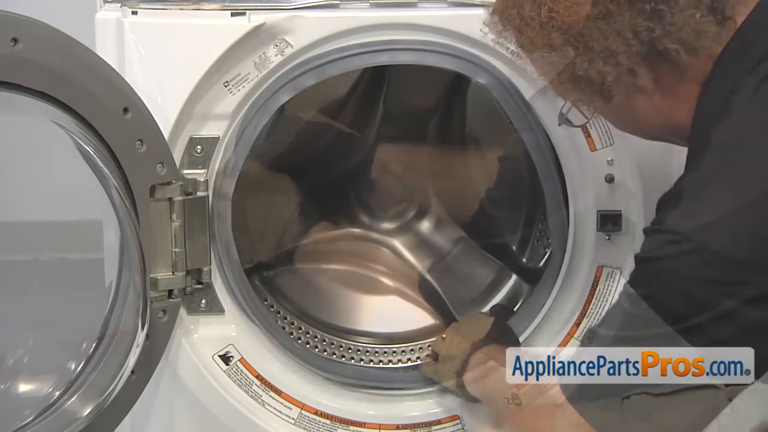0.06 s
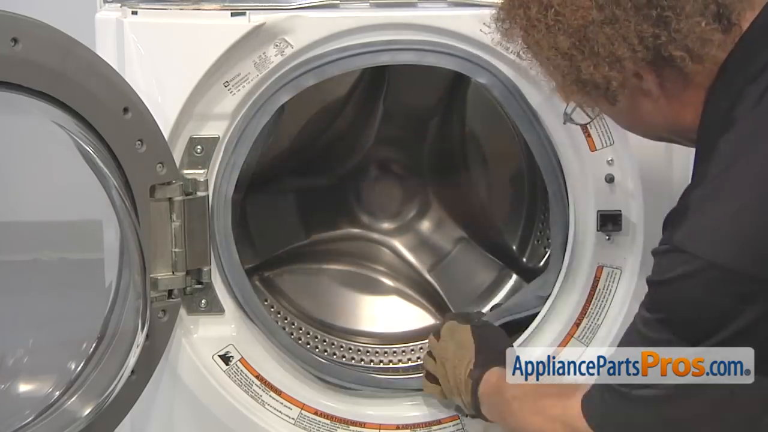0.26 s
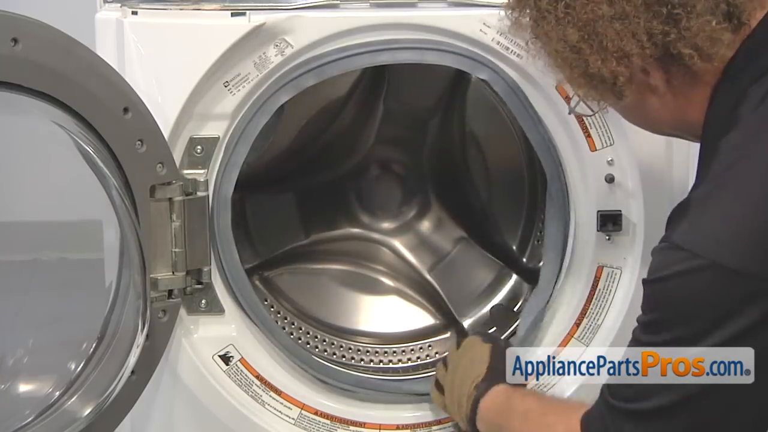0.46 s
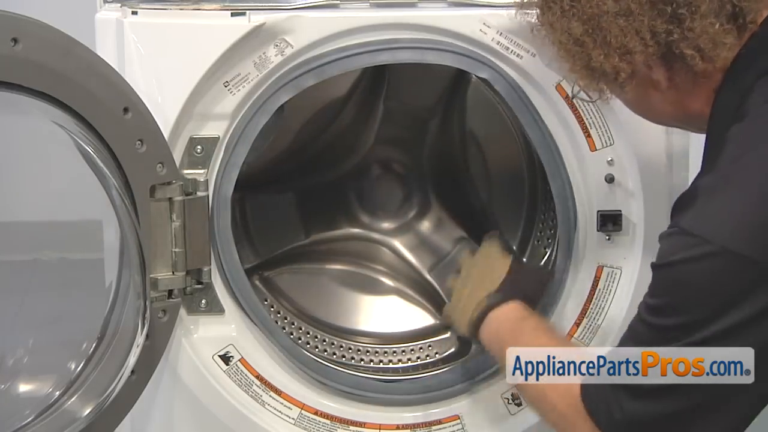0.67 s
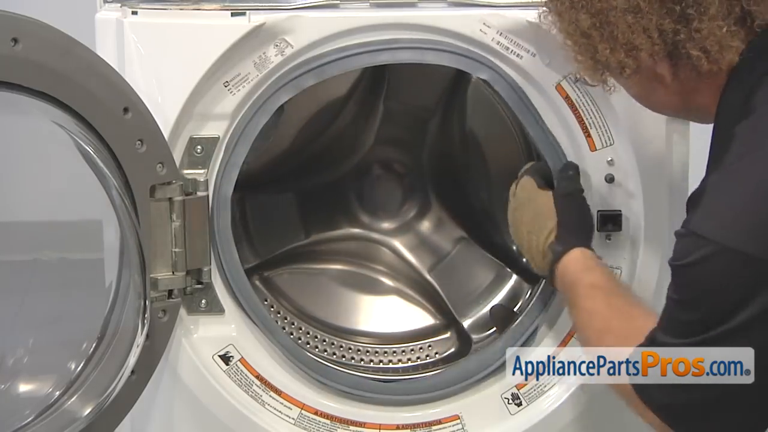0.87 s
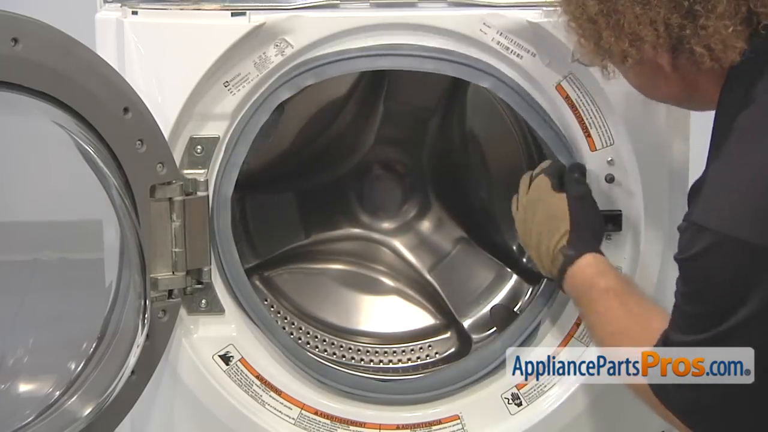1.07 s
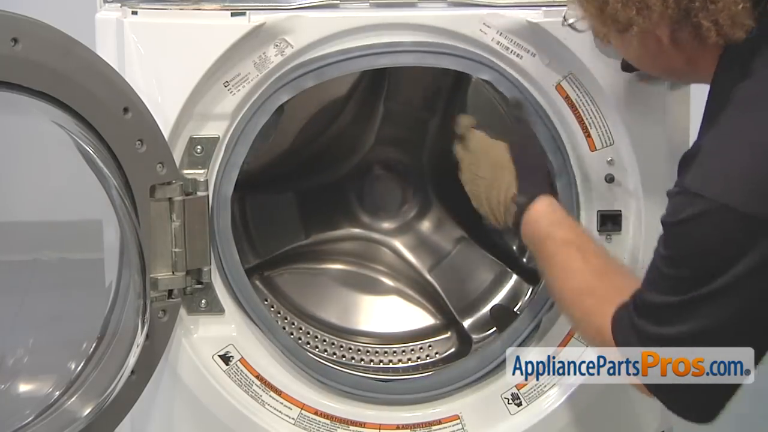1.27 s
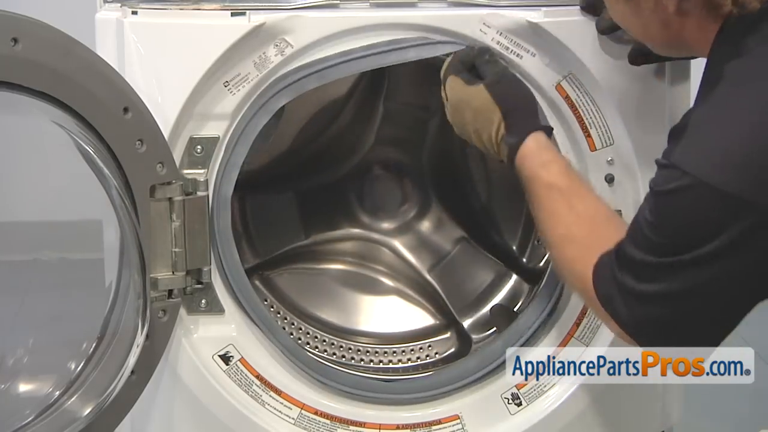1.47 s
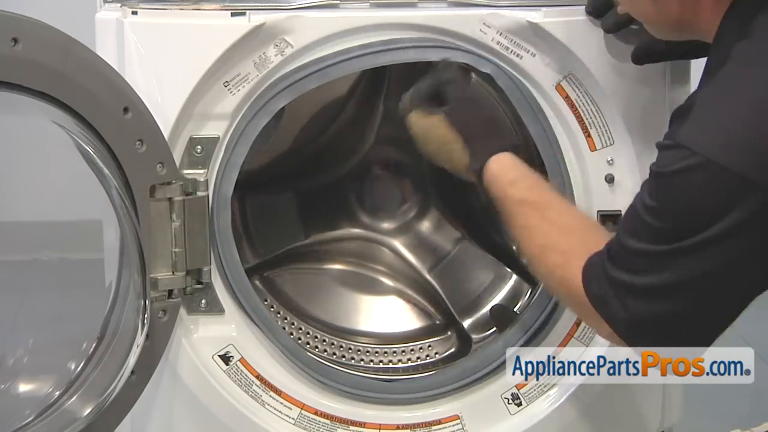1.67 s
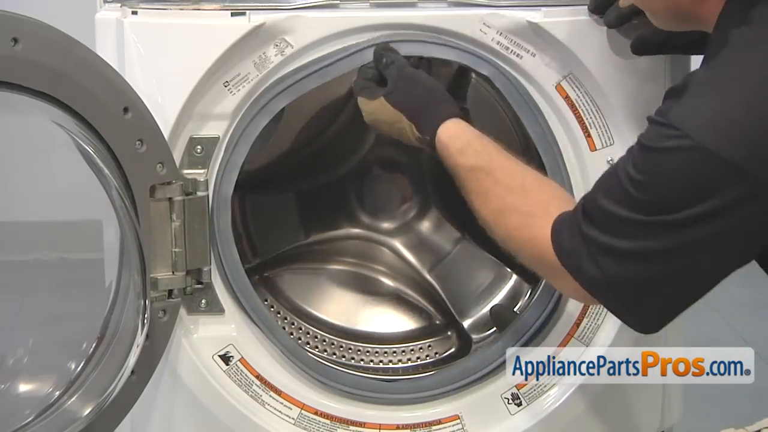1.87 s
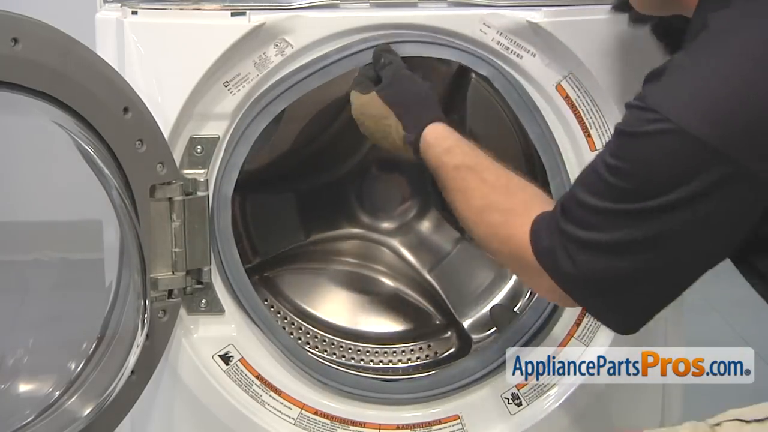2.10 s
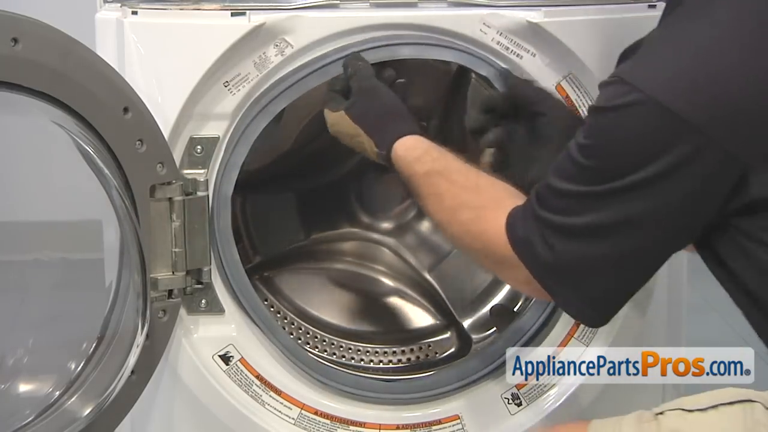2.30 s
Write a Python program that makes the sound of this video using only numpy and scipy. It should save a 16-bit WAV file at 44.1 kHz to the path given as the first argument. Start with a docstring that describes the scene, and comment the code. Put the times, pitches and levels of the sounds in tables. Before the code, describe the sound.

A rubber door seal is worked onto a washer in a small room, heard up close. A soft thump and two sharp snaps come first, followed by lighter knocks, faint glove rubbing and a short scuff that rings the steel drum.

```python
"""A glove brushes softly over rubber, then a tap and a low thump sound in a small room:
hands are pressing a door seal onto the rim of a washing machine. Finger impacts excite the modes
of the steel drum and the cabinet, each push makes the sprung tub boom, and the lip of the seal
snaps into place. Sliding gloves give friction noise, and the rubber judders briefly by stick-slip,
loudest near the end, setting the drum ringing."""
import sys
import numpy as np
from scipy import signal
from scipy.fft import rfft, irfft
from scipy.io import wavfile
from scipy.ndimage import uniform_filter1d

SR = 44100
rng = np.random.default_rng(int(sys.argv[2]) if len(sys.argv) > 2 else 0)


def digitize_waveform(pressure):
    """Quantize a signal to 16-bit integers and store it at the path in sys.argv[1].

    Rows of a 2-D input are taken as channels; values are limited to [-1, 1].
    """
    field = np.atleast_2d(pressure).T
    bounded = np.clip(field, -1, 1)
    quanta = np.round(bounded * 32767).astype(np.int16)
    wavfile.write(sys.argv[1], SR, quanta)


N = 105840
TIME = np.arange(N) / SR
EVENT_TIME = TIME[:SR // 2]


def amp(db):
    """Decibels to amplitude ratio."""
    return 10 ** (np.asarray(db) / 20)


def unit_rms(x):
    """Scales to rms 1."""
    return x / np.sqrt(np.mean(x ** 2) + 1e-20)


def unit_peak(x):
    """Scales so that the loudest 5 ms have rms 1."""
    return x / np.sqrt(uniform_filter1d(x ** 2, size=220).max() + 1e-20)


def value_at(points, hz):
    """Interpolates on a log-frequency axis."""
    point_hz, value = np.transpose(points)
    return np.interp(np.log(hz + 1), np.log(point_hz + 1), value)


def add(mix, start_s, sound):
    """Superposition: a sound adds to the mix from start_s on."""
    part = mix[max(round(start_s * SR), 0):][:len(sound)]
    part += sound[:len(part)]


def colour(x, spectrum):
    """Spectral shaping of a steady signal, at rms 1."""
    gain = amp(value_at(spectrum, np.fft.rfftfreq(len(x), 1 / SR)))
    return unit_rms(irfft(rfft(x) * gain, len(x)))


def decay(t, t60):
    """Exponential damping: 60 dB down in t60 seconds."""
    return np.exp(-np.log(1000) * t / t60)


def swell(peak_s, rise_s, fall_s):
    """Envelope of a pressure that builds until peak_s and lets go."""
    distance = (TIME - peak_s) / np.where(TIME < peak_s, rise_s, fall_s)
    return np.exp(1 - np.hypot(1, distance * np.sqrt(2)))


def click(spectrum, size=4096):
    """Minimum phase gives the sharpest click that has this spectrum."""
    log_gain = np.log(amp(value_at(spectrum, abs(np.fft.fftfreq(size, 1 / SR)))))
    response = np.exp(np.conj(signal.hilbert(log_gain)))
    return np.fft.ifft(response).real[:size // 2]


def burst(spectrum, t60, direct):
    """Multiple reflection: a click and its dense, quickly dying echoes inside the machine."""
    echoes = rng.choice([-1., 1.], len(EVENT_TIME)) * decay(EVENT_TIME, t60)
    paths = echoes / np.linalg.norm(echoes) + direct * (EVENT_TIME == 0)
    return unit_peak(signal.fftconvolve(paths, click(spectrum))[:len(EVENT_TIME)])


def ring(modes):
    """Free vibration: a struck body sounds as a sum of damped modes."""
    return unit_peak(sum(amp(db) * decay(EVENT_TIME, t60) * np.cos(2 * np.pi * hz * EVENT_TIME)
                         for hz, db, t60 in modes))


def soften(x, cutoff_hz):
    """A soft contact acts as a low-pass filter."""
    lowpass = signal.butter(3, min(cutoff_hz, SR / 3), fs=SR, output="sos")
    return unit_peak(signal.sosfilt(lowpass, x))


# Background spectrum. Each row: frequency in Hz, relative density in dB.
ROOM_TONE_SPECTRUM = [(12, -11), (20, -0.5), (60, -3), (83, -2.5), (150, -11.5), (285, -8.5), (459, -43.5),
                      (718, -14.5), (1030, -23), (1290, -22), (3160, -31.5), (13200, -33), (16000, -32.5)]

def room_tone(level_db=-64):
    """Stationary noise, strongest in the bass."""
    return amp(level_db) * colour(rng.standard_normal(N), ROOM_TONE_SPECTRUM)


# Reverberation times. Each row: frequency in Hz, t60 in seconds.
ROOM_T60 = [(100, 0.54), (300, 0.37), (750, 0.17), (1500, 0.16), (4000, 0.18), (14000, 0.14)]

def reverberation(x, onset_s):
    """A diffuse field builds up and decays, the bass lasting longest."""
    hz, t, noise = signal.stft(rng.standard_normal(len(EVENT_TIME)), SR, nperseg=256)
    damped = noise * decay(t, value_at(ROOM_T60, hz)[:, None])
    tail = signal.istft(damped, SR, nperseg=256)[1][:len(EVENT_TIME)]
    tail *= 1 - np.exp(-(EVENT_TIME / onset_s) ** 2)
    return signal.fftconvolve(x, tail / np.linalg.norm(tail))[:N]


# Spectrum of the swaying tub. Each row: frequency in Hz, relative density in dB.
SWAY_SPECTRUM = [(20, -15.5), (45, 2), (85, 2), (130, -5.5), (290, -11), (450, -22), (1000, -64),
                 (4000, -44)]
# Strength of the sway. Each row: time in seconds, level in dB.
SWAY_LEVELS = [(0, -59), (.35, -51), (.7, -54), (1.1, -57.5), (1.7, -56), (2.1, -57.5), (2.4, -60.5)]

def tub_sway():
    """Forced vibration: the sprung tub rumbles as it sways under the hands."""
    level_db = np.interp(TIME, *np.transpose(SWAY_LEVELS))
    return amp(level_db) * colour(rng.standard_normal(N), SWAY_SPECTRUM)


# Spectra of fabric hiss and rubber scuff. Each row: frequency in Hz, relative density in dB.
HISS_SPECTRUM = [(300, -20), (1500, -1.5), (4000, -3), (7000, 2.5), (9500, -4.5), (12000, 3.5),
                 (16000, -5.5)]
SCUFF_SPECTRUM = [(80, 11.5), (300, 3), (750, 4.5), (1400, -4), (2200, -8.5), (5000, -18.5), (16000, -38)]
# Glove strokes. Each row: peak time, rise and fall in seconds, hiss and scuff levels in dB.
STROKES = [(0.058, 0.091, 0.062, -70.5, -61.5), (.265, 0.052, 0.033, -66.5, -68.5),
           (0.608, 0.09, 0.058, -71, -56.5), (.84, 0.022, 0.012, -70, -94),
           (0.972, 0.012, 0.012, -76, -56.5), (1.035, 0.052, 0.038, -70, -67),
           (1.248, 0.023, 0.013, -61.5, -63.5), (1.52, 0.15, 0.077, -81, -64),
           (1.711, 0.031, 0.065, -74.5, -66.5), (1.88, 0.033, 0.027, -73, -74.5),
           (1.959, 0.022, 0.022, -67.5, -57), (2.112, 0.024, 0.0067, -61.5, -47.5),
           (2.306, 0.012, 0.028, -59.5, -63)]

def glove_strokes(grain_db=3):
    """Sliding friction: fabric hisses and rubber scuffs, both in fine grains."""
    grains = amp(grain_db * np.minimum(rng.exponential(1, N), 4))
    hiss = colour(rng.standard_normal(N) * grains, HISS_SPECTRUM)
    scuff = colour(rng.standard_normal(N) * grains, SCUFF_SPECTRUM)
    return sum(swell(peak_s, rise_s, fall_s) * (amp(hiss_db) * hiss + amp(scuff_db) * scuff)
               for peak_s, rise_s, fall_s, hiss_db, scuff_db in STROKES)


# Modes of drum and rim. Each row: frequency in Hz, relative level in dB, t60 in seconds.
DRUM_MODES = [(523, -7, .07), (592, -3, .085), (702, 0, .08), (765, -7, .07), (836, 1, .08), (1100, 0, .06),
              (1335, 3, .06), (1760, -14, .05), (2270, -10, .06)]
# Judders of the rubber. Each row: peak time, rise and fall in seconds, gain in dB,
# slips per second, cutoff in Hz.
RUBBER_JUDDERS = [(.300, 0.01, 0.0029, -55, 228.8, 740), (0.56, 0.0062, 0.0017, -45.5, 262, 860),
                  (2.1133, 0.015, 0.0032, -36, 119, 1300)]

def rubber_judder(jitter=0.02, grit=0.03):
    """Stick-slip friction: short runs of uneven slips drive the drum's modes."""
    out = np.zeros(N)
    for peak_s, rise_s, fall_s, db, slip_hz, cutoff_hz in RUBBER_JUDDERS:
        wander = unit_rms(uniform_filter1d(rng.standard_normal(N), size=300))
        cycles = np.cumsum(slip_hz * (1 + jitter * wander)) / SR
        cycles -= np.interp(peak_s, TIME, cycles)  # one slip lands on the peak
        slips = np.diff(np.floor(cycles), prepend=np.floor(cycles[0]))
        force = (slips + grit * rng.standard_normal(N)) * swell(peak_s, rise_s, fall_s)
        drum = soften(ring(DRUM_MODES), cutoff_hz)
        out += amp(db) * signal.fftconvolve(force, drum)[:N]
    return out


# Pushes on the tub. Each row: start in seconds, level in dB, pitch in Hz, hold and t60 in seconds.
TUB_THUMPS = [(0.257, -32, 92.3, 0.0086, 0.26), (0.456, -36, 96, 0.013, 0.38),
              (0.575, -31.5, 95.3, 0.039, 0.12), (.935, -49.5, 90, 0.039, 0.18),
              (1.05, -40.5, 79, 0.015, 0.2), (1.236, -45.5, 63.6, 0.049, 0.059),
              (1.467, -45, 86.4, 0.016, 0.14), (1.558, -32.5, 80.7, 0.026, 0.053),
              (1.736, -43, 73, 0.016, 0.059), (1.959, -43.5, 90, 0.013, 0.21),
              (2.074, -44.5, 133, 0.019, 0.19)]

def tub_thumps(rise_s=0.0072):
    """A damped mass-spring oscillator: the tub booms at one low pitch with each push."""
    out = np.zeros(N)
    attack = 1 - np.exp(-(EVENT_TIME / rise_s) ** 2)
    for start_s, db, hz, hold_s, t60 in TUB_THUMPS:
        envelope = attack * decay(np.maximum(EVENT_TIME - hold_s, 0), t60)
        add(out, start_s, amp(db) * envelope * np.sin(2 * np.pi * hz * EVENT_TIME))
    return out


# Modes of the cabinet. Each row: frequency in Hz, relative level in dB, t60 in seconds.
CABINET_MODES = [(137.5, -8, 0.19), (165.4, -7.5, 0.22), (237, 2, 0.13), (280.6, -1.5, 0.14),
                 (368.6, -0.5, 0.18), (510, 8, 0.028)]
# Spectra of the echoes in drum and cabinet. Each row: frequency in Hz, relative density in dB.
DRUM_SPECTRUM = [(40, -51), (200, 0.5), (430, -12), (600, 13), (800, -3.5), (1150, -3.5), (1500, -8.5),
                 (3000, -20), (8000, -13)]
CABINET_SPECTRUM = [(30, -40), (70, -7.5), (150, -12), (280, -2.5), (480, -7), (750, -41), (2000, -82),
                    (9000, -72)]
# Taps on the rim. Each row: start in seconds, drum level in dB, drum cutoff in Hz, cabinet level in dB.
FINGER_TAPS = [(0.246, -41, 1220, -35), (0.4537, -51, 2420, -43), (0.5734, -40.5, 2500, -30),
               (.916, -59.5, 1600, -58), (.975, -61, 2510, -65), (1.027, -45.5, 1670, -46),
               (1.175, -58, 1200, -54), (1.2559, -37.5, 1270, -45), (1.477, -43.5, 1070, -63),
               (1.551, -52, 1500, -45), (1.561, -52.5, 2000, -49), (1.7161, -47, 1430, -50.5),
               (2.076, -45.5, 880, -48)]

def finger_taps(cabinet_cutoff_hz=560):
    """Impact excitation: padded fingers ring the drum and knock the cabinet."""
    out = np.zeros(N)
    for start_s, drum_db, cutoff_hz, cabinet_db in FINGER_TAPS:
        drum_echoes = amp(7) * burst(DRUM_SPECTRUM, t60=0.039, direct=0.72)
        drum = soften(ring(DRUM_MODES) + drum_echoes, cutoff_hz)
        cabinet_echoes = amp(2) * burst(CABINET_SPECTRUM, t60=0.066, direct=0.86)
        cabinet = unit_peak(soften(ring(CABINET_MODES), cabinet_cutoff_hz) + cabinet_echoes)
        add(out, start_s, amp(drum_db) * drum + amp(cabinet_db) * cabinet)
    return out


# Spectra of the lip's crack and the rim's clack. Each row: frequency in Hz, relative density in dB.
CRACK_SPECTRUM = [(40, -22), (250, 4), (1200, 11.5), (2800, -3), (4300, 2.5), (7500, 5.5), (10000, -0.5),
                  (12300, 5), (16000, -2.5)]
CLACK_SPECTRUM = [(30, -47), (150, -9.5), (450, 6), (1050, 2), (2000, -8), (2600, -4), (3100, -0.5),
                  (3700, -4.5), (5000, -16), (16000, -38)]
# Snaps of the seal's lip. Each row: start in seconds, crack level in dB, clack level in dB.
SEAL_SNAPS = [(0.4537, -38, -74), (.529, -56.5, -51), (0.5705, -46, -36.5), (0.5739, -35.5, -26.5),
              (0.664, -60, -63), (.980, -71, -61.5), (1.0265, -70, -61), (1.2569, -70, -54),
              (1.474, -67, -75), (1.552, -60.5, -72), (1.561, -75, -56.5), (1.714, -59.5, -57)]

def seal_snaps():
    """Impulsive excitation: the lip slips over the rim with a bright crack and a hard clack."""
    out = np.zeros(N)
    for start_s, crack_db, clack_db in SEAL_SNAPS:
        crack = amp(crack_db) * burst(CRACK_SPECTRUM, t60=0.038, direct=0.05)
        clack = amp(clack_db) * burst(CLACK_SPECTRUM, t60=0.021, direct=0.58)
        add(out, start_s, crack + clack)
    return out


def scene(right_bias_db=1.6):
    """Mid-side stereo, nearly mono; a level difference places the work a little to the right."""
    contacts = finger_taps() + seal_snaps() + glove_strokes() + rubber_judder()
    mid = contacts + amp(-9.5) * reverberation(contacts, onset_s=0.0027)
    mid += tub_sway() + tub_thumps() + room_tone()
    side = amp(-43) * reverberation(contacts, onset_s=0.00081)
    side += amp(-78) * rng.standard_normal(N)  # faint, wide hiss
    return np.array([(mid + side) * amp(-right_bias_db / 2), (mid - side) * amp(right_bias_db / 2)])


def record(dry):
    """Band limiting: a steep low-pass at 15.9 kHz."""
    lowpass = signal.firwin(511, 15900, window=("kaiser", 9), fs=SR)
    return signal.oaconvolve(dry, lowpass[None], "same")


dry = scene()
out = record(dry)
digitize_waveform(out)
```